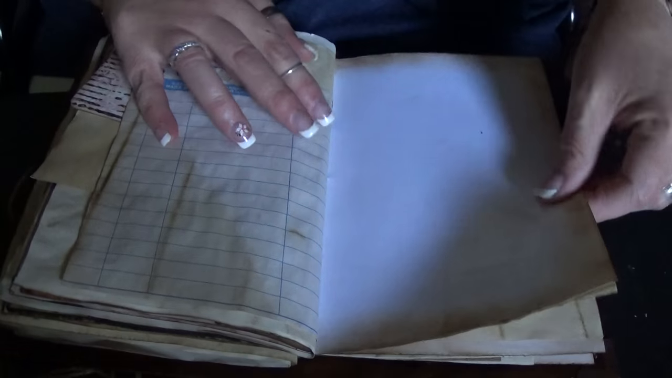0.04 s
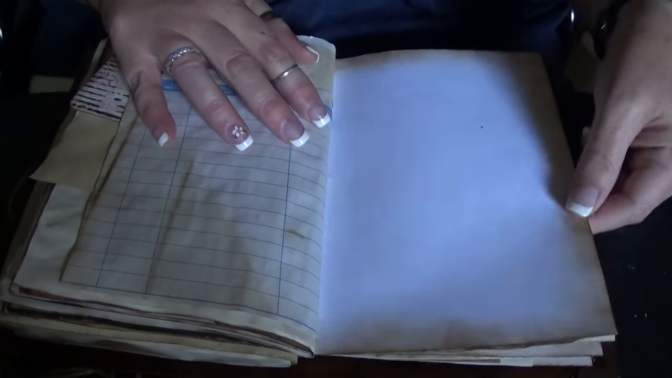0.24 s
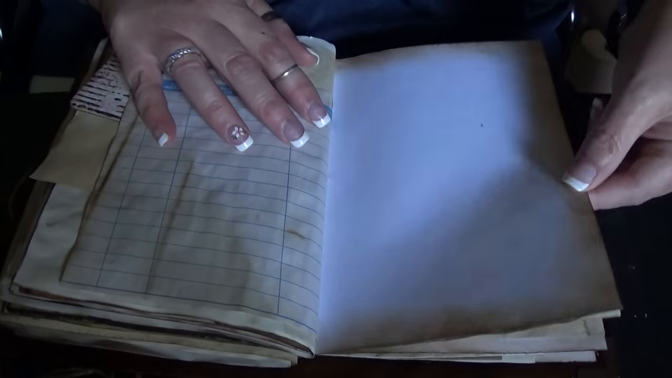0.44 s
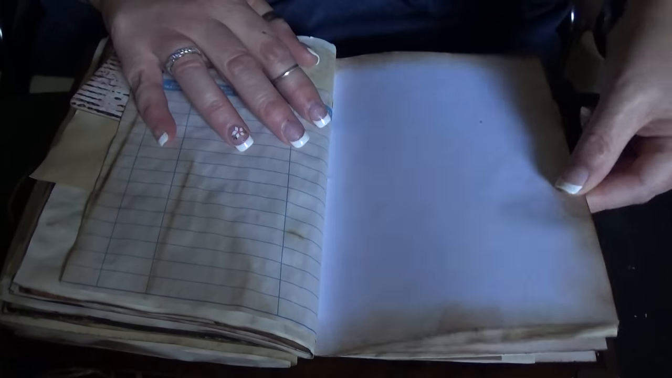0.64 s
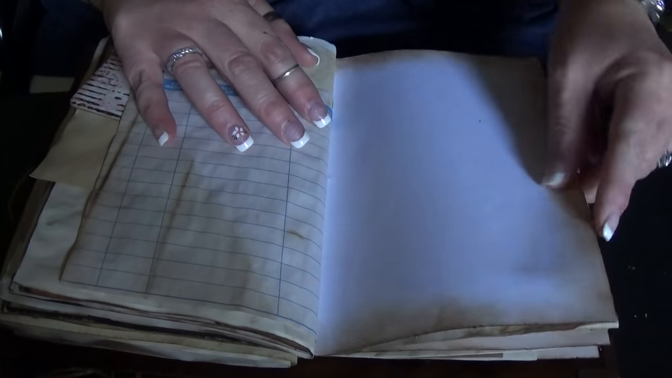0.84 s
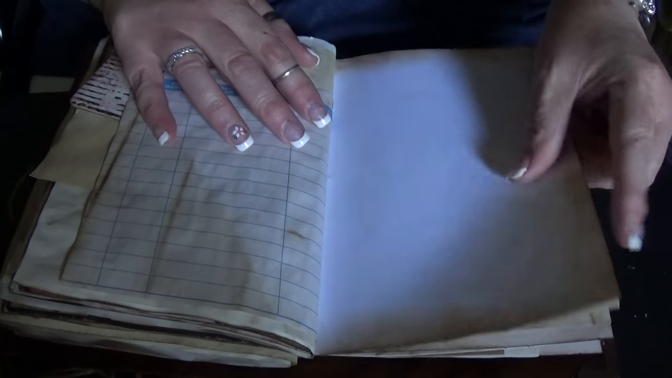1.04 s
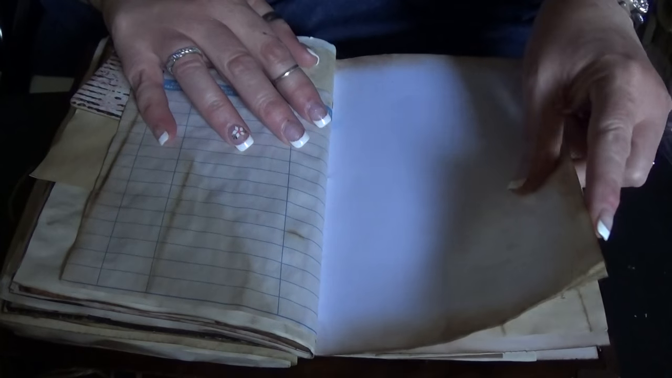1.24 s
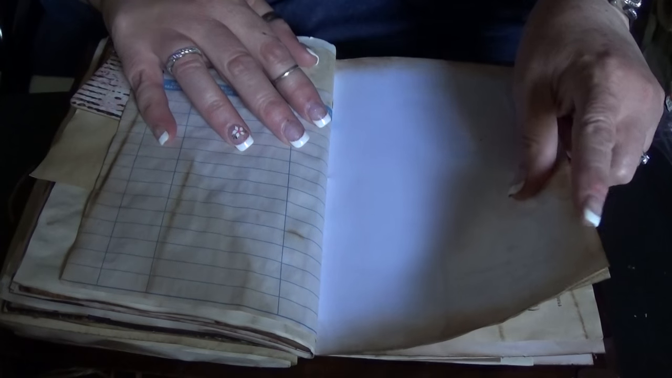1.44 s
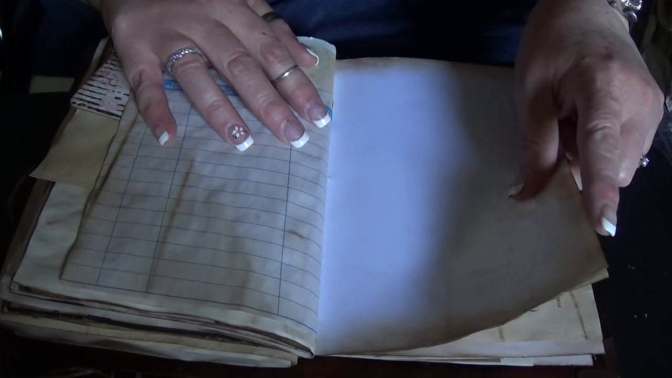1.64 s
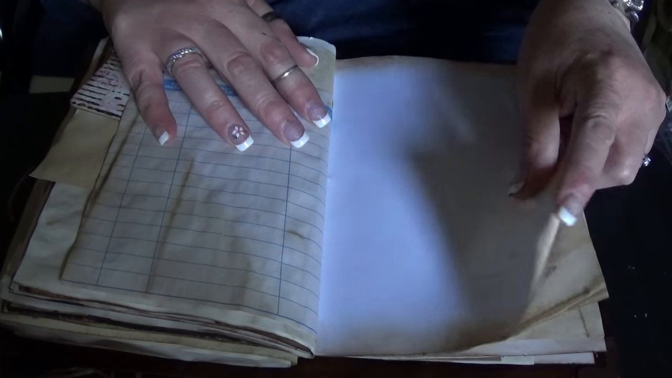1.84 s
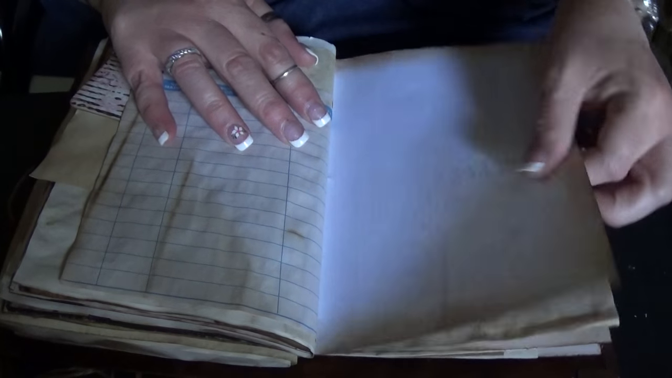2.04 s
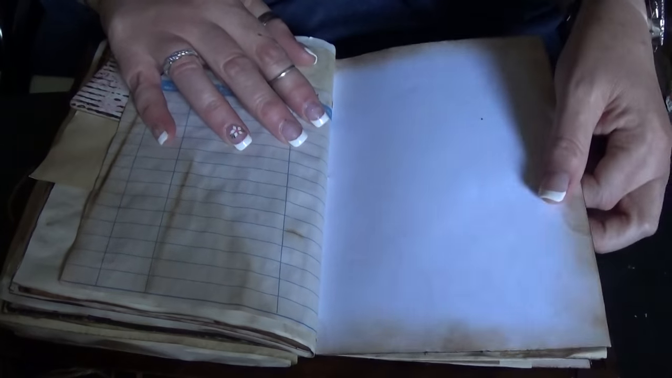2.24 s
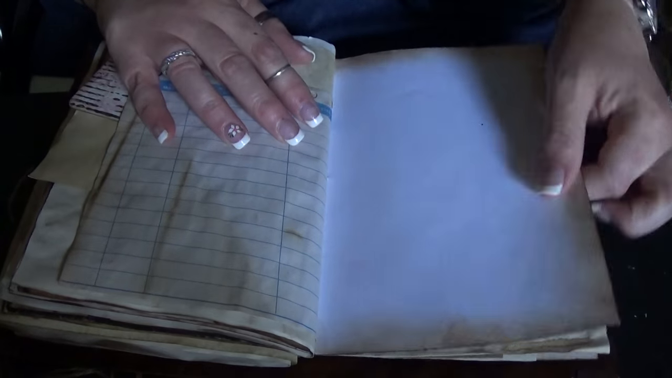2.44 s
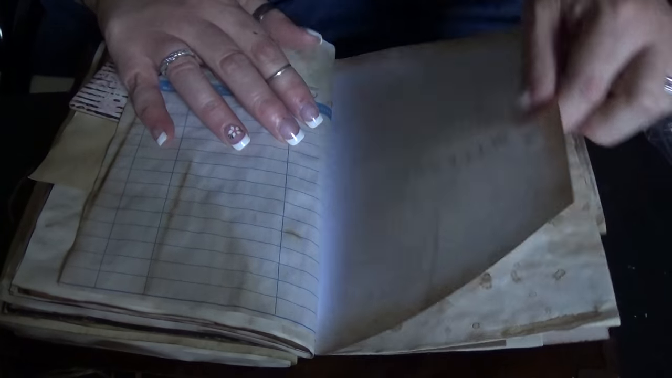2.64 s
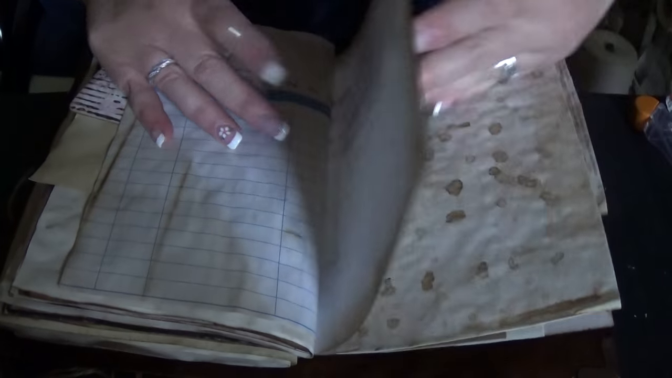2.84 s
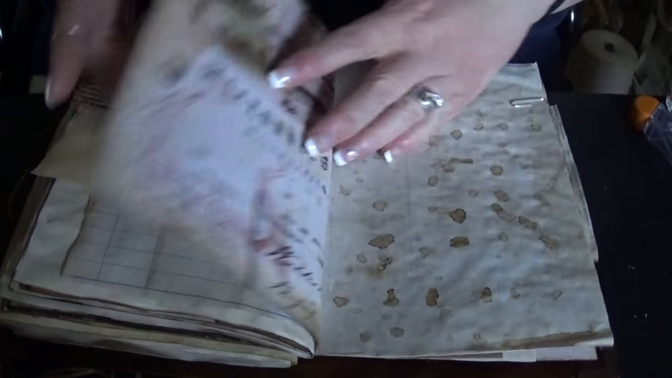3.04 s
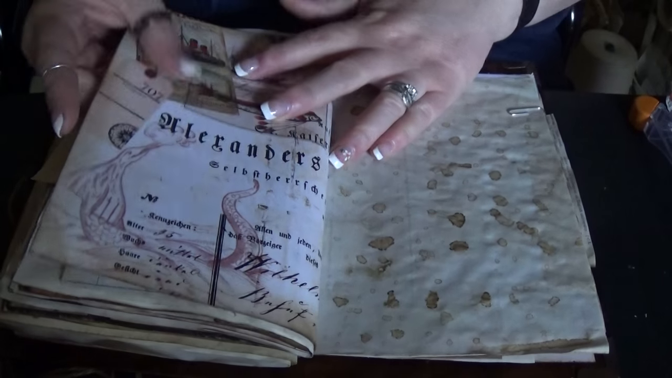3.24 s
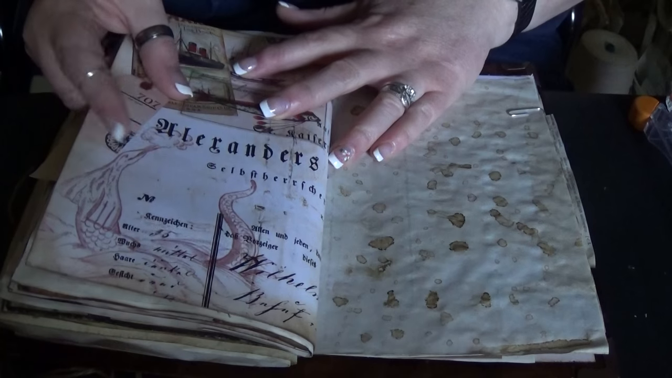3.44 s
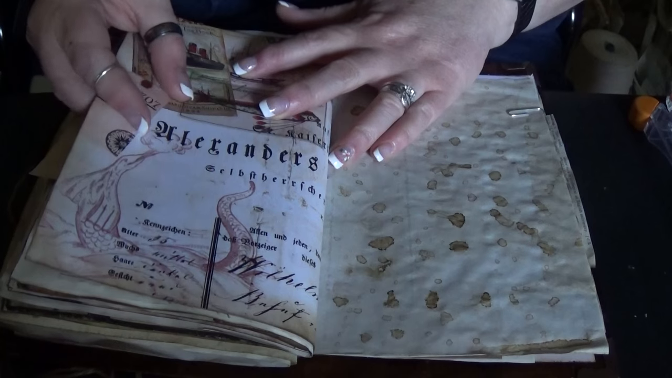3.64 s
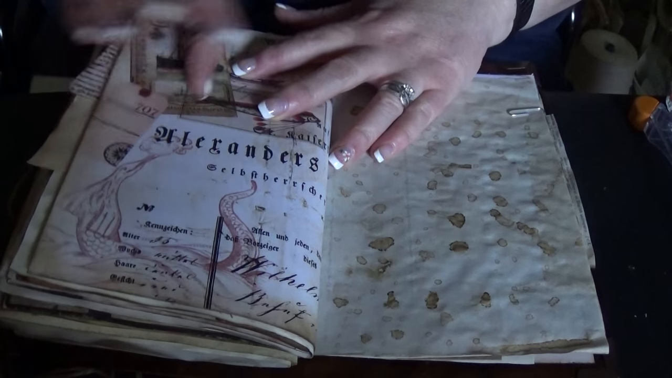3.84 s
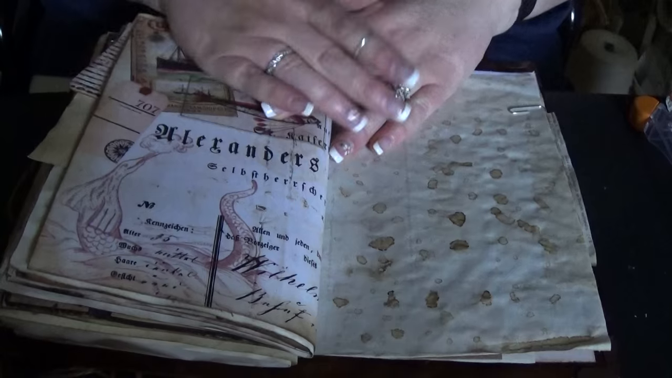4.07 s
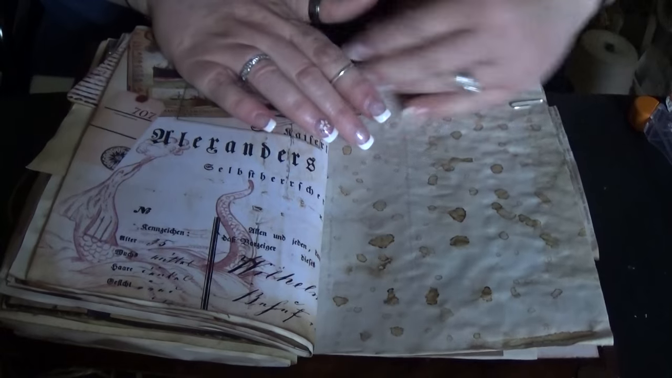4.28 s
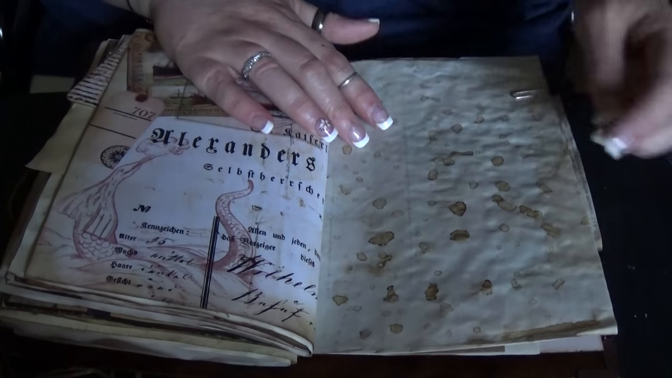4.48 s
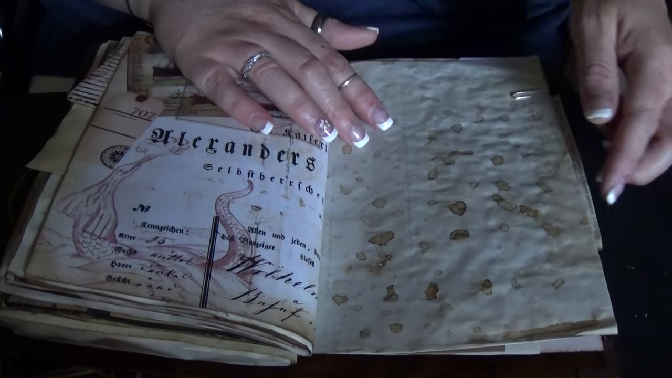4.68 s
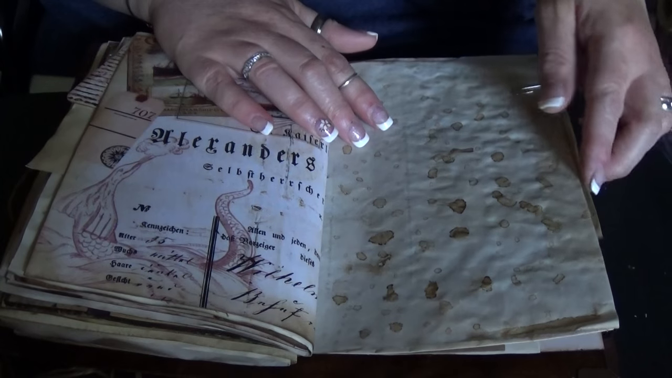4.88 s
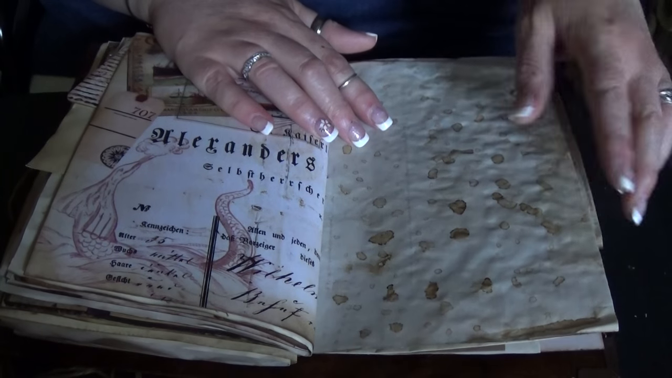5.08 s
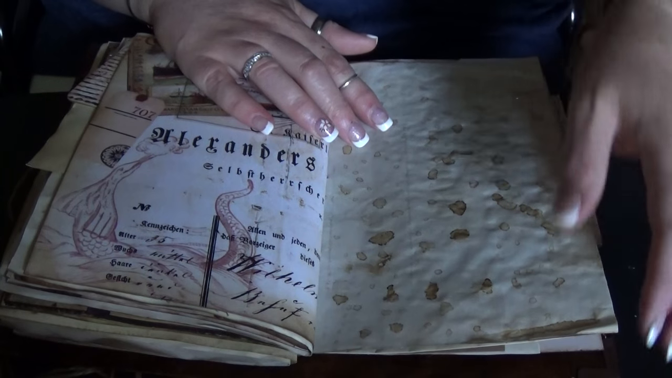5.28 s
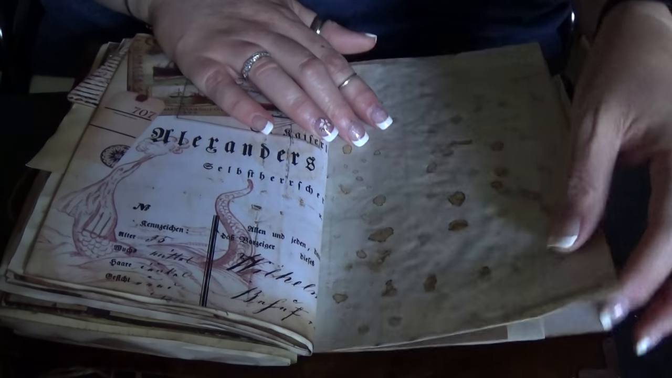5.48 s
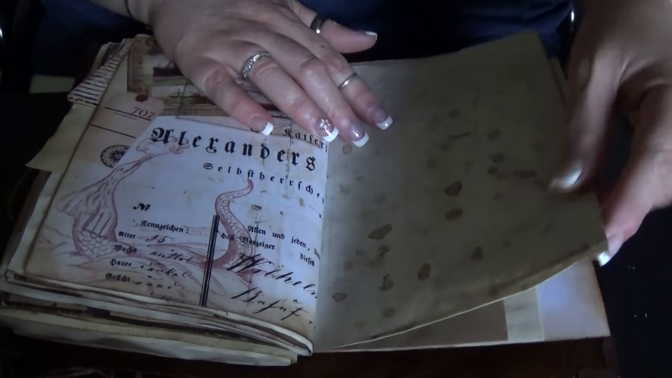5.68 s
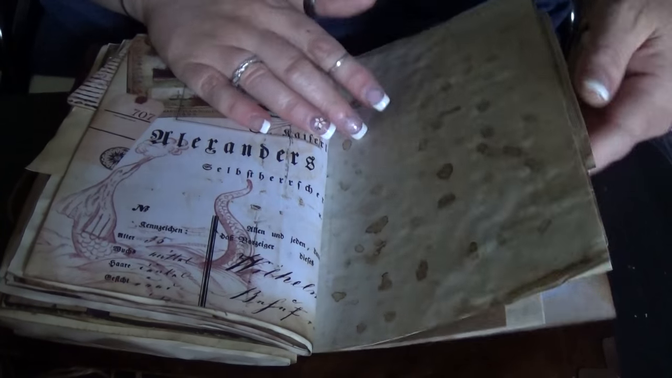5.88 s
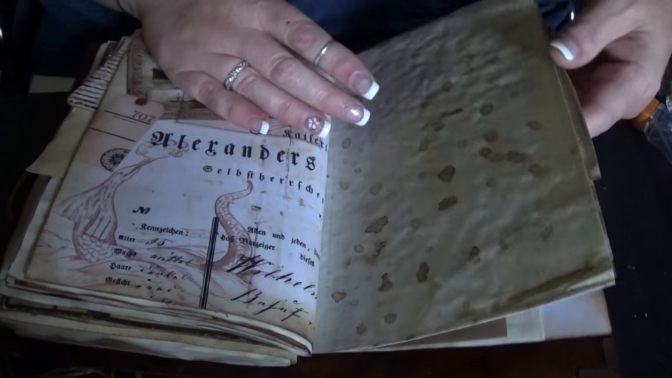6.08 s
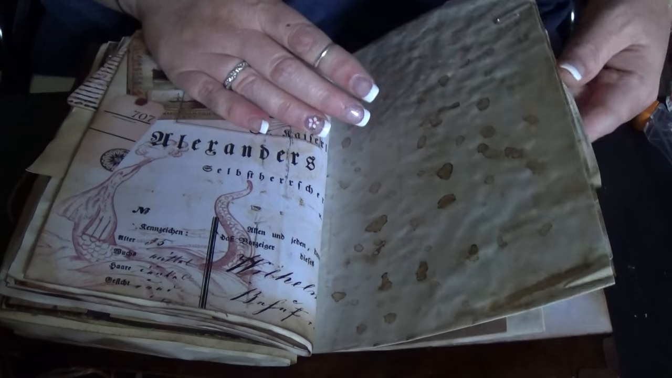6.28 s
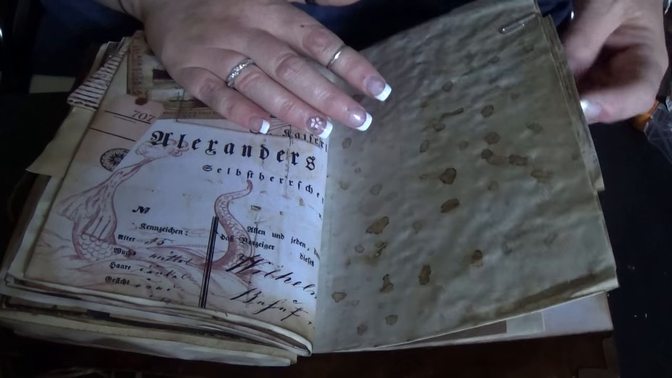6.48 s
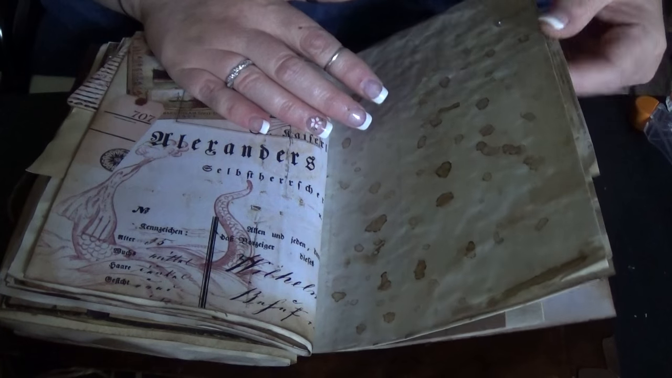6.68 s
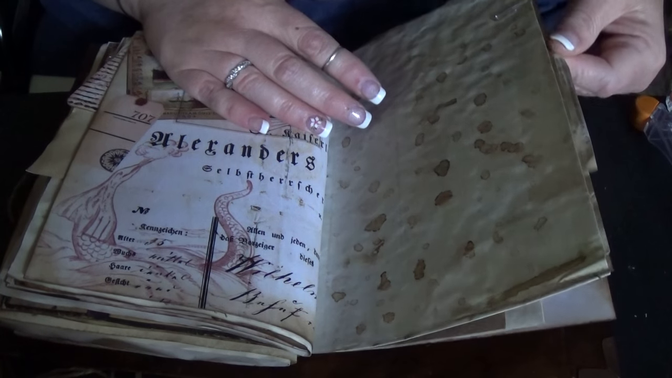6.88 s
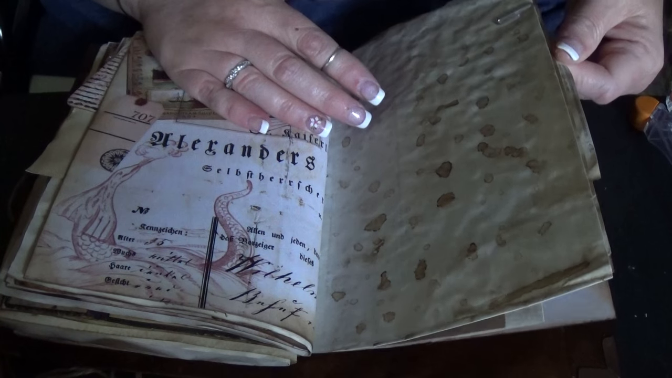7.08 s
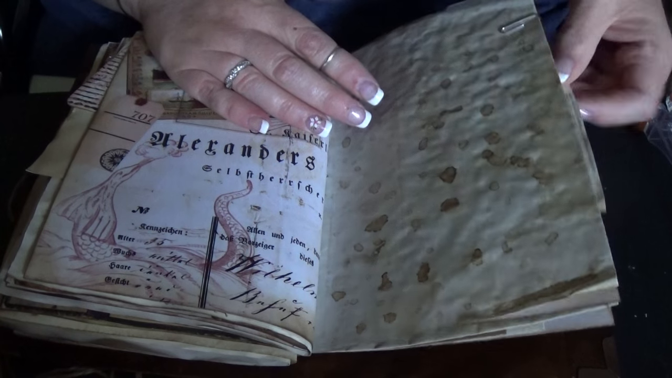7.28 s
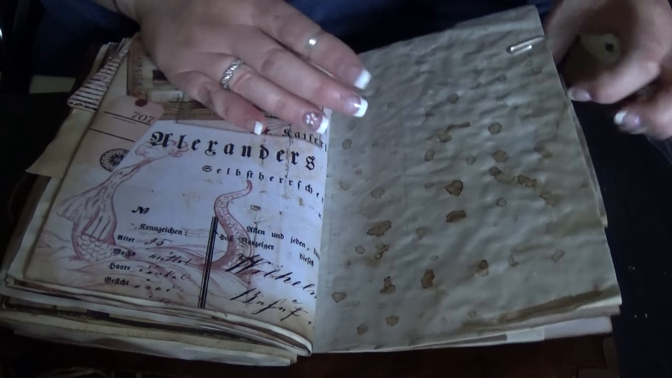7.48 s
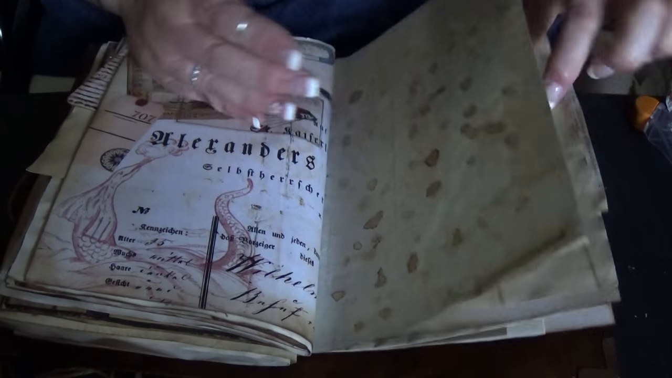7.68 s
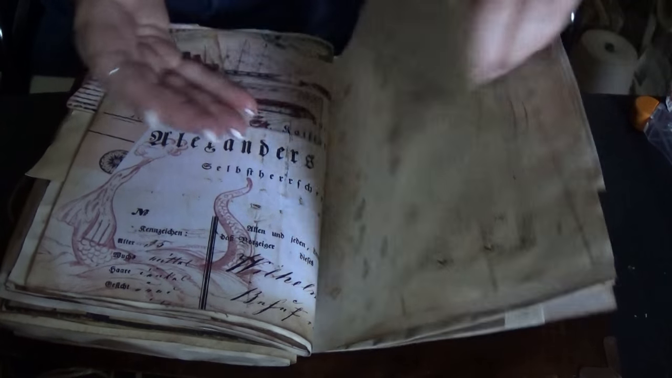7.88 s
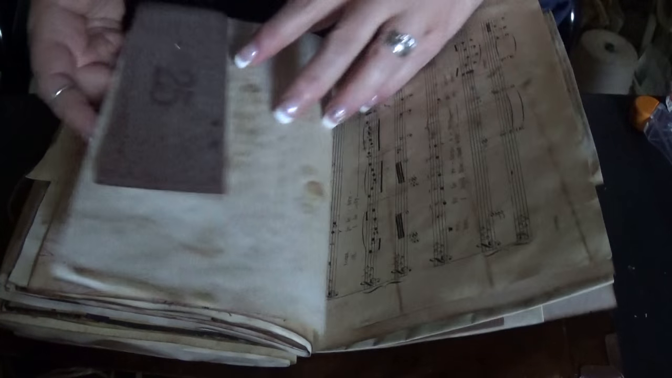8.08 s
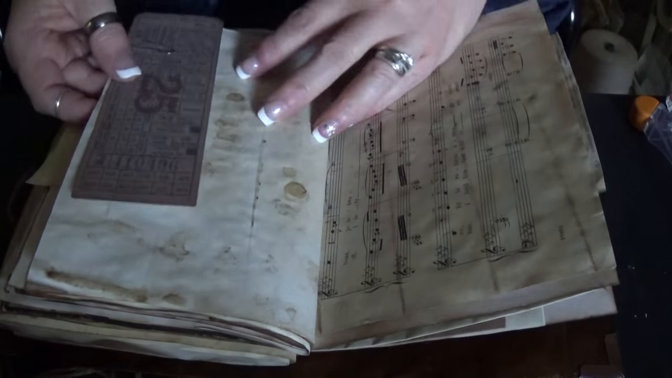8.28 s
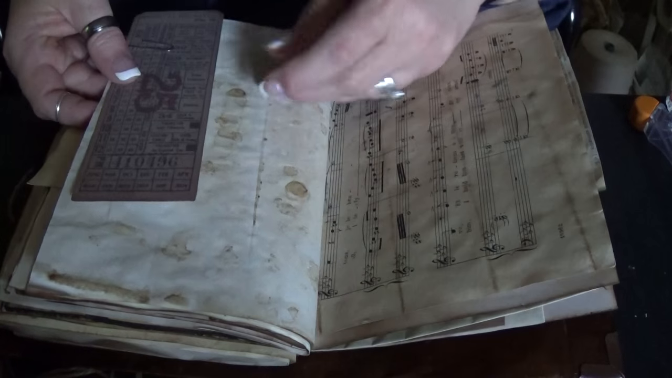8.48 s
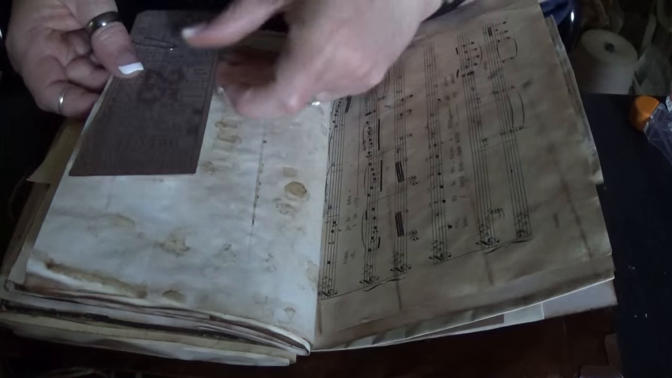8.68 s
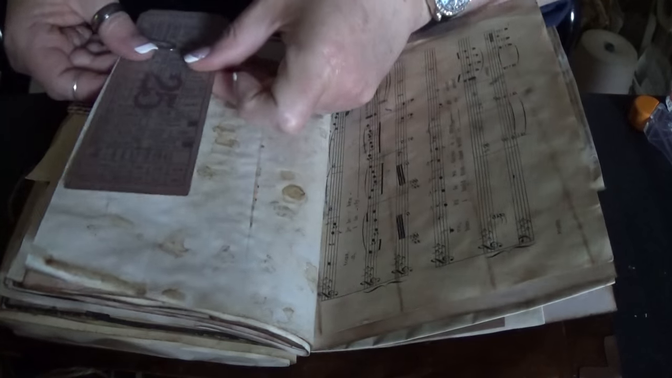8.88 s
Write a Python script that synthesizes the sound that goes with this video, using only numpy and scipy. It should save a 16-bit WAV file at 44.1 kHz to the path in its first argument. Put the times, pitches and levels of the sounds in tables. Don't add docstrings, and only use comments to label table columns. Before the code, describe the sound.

Close stereo pickup in a small, quiet, dry room, with light hiss, low room tone and wavering distant engine drones. From 0 to 1 s stiff paper rustles in short bursts with soft drops at 0.25 and 0.7. A sharp crease snap comes at 1.3, then a crackling, hissy flurry around 1.9-2.1. Faint, fast, high lens ticks run between about 0.4 and 5.5, mostly buried. A page turns from 2.7, landing firmly near 3.15; low pushes and rustle follow at 3.7-3.8, then smooth hand sliding around 4.2. From 4.5 to 5.4 it is sparse, with small ticks of paper. Crinkles return at 5.5, and a strong crackle with a thud comes at 6.35-6.4. After a lull near 7, rustling builds from 7.3 into the loudest snaps at 7.9 and 8.1 as another leaf turns. Smoothing, rubbing and crackles continue to 8.9.

```python
import sys
import numpy as np
from scipy import signal
from scipy.fft import rfft, irfft, next_fast_len
from scipy.io import wavfile
from scipy.ndimage import uniform_filter1d

SR = 44100
rng = np.random.default_rng(int(sys.argv[2]) if len(sys.argv) > 2 else 0)


def volts_from_db(level):
    exponent = np.asarray(level, float) / 20
    return 10 ** exponent


def dump(signal):
    limited = np.clip(np.atleast_2d(signal).T, -1, 1)
    pcm = np.round(limited * 32767).astype(np.int16)
    wavfile.write(sys.argv[1], SR, pcm)


N = 393372
TIME_S = np.arange(N) / SR

# freq_hz, density_db
SELF_NOISE = [(1180, -30), (2000, -4), (5830, -9.5), (9170, -8.5), (12000, -15), (15100, -12), (16000, -26)]
# freq_hz, density_db
ROOM_TONE = [(15, -42), (25, -11), (124, -3.5), (162, -3.5), (204, -7), (248, -1.5), (300, -9.5), (486, -8),
             (649, -13.5), (866, -10), (2500, -27.5), (3250, -59), (5500, -120)]
# freq_hz, correlation
LIKENESS = [(60, 0.99), (180, 0.98), (550, 0.75), (1650, 0.28), (4970, 0.51), (15000, 0.98)]
# start_s, level_db
TRAFFIC_LEVEL = [(0, 1.5), (2, 1), (4, 2), (5.5, 0), (7, 0), (8.92, 2)]
# start_s, pitch_hz, level_db
ENGINES = [
    [(0, 93, -65.5), (1.1, 93.7, -71.5), (2.6, 93.8, -58.5), (3.3, 93.2, -59), (3.9, 94.5, -72),
     (4.4, 96.6, -67)],
    [(.5, 212.5, -74), (.9, 216.6, -65.5), (1.3, 217.5, -60), (1.9, 217, -67), (2.3, 216, -80)],
    [(3.6, 250, -90), (4.4, 252, -69), (5.4, 244.4, -80.5), (6.5, 250, -75), (7.0, 252, -89)],
]
# start_s, level_db
LENS_LEVEL = [(.40, -57), (1.55, -61), (1.58, -80), (1.61, -80), (1.63, -59.5), (2.1, -57), (2.12, -70),
              (2.21, -70), (2.23, -60), (3.885, -58.5), (3.9, -80), (3.95, -80), (3.965, -60), (4.49, -59),
              (4.5, -70), (5.45, -67), (5.5, -90)]
# freq_hz, t60_s
ROOM_DECAY = [(200, 0.36), (4000, 0.089), (10000, 0.048), (16000, 0.13)]
# start_s, left_right_db
HAND_PAN = [(0.0, -1.5), (2.48, -0.5), (3.63, 2), (4.89, -2.5), (7.2, -1.0), (8.92, 1.0)]
# start_s, peak_db, pitch_hz
AIR_PUSHES = [
    (.24, -42, 272),
    (.67, -44.5, 274),
    (1.98, -63, 130),
    (3.139, -38.5, 475),
    (3.72, -45.5, 196),
    (3.801, -45, 130),
    (6.399, -45, 240),
    (7.929, -53, 140),
    (8.15, -50, 180),
    (8.7, -48, 300),
]
# start_s, peak_db, ring_hz, crack_over_peak_db, thump_over_peak_db
CREASES = [(0.2444, -36, 2090, -9, -1), (0.4319, -39, 3230, 4.5, -7), (0.6534, -34, 2270, -2, 1.5),
           (0.6774, -27, 2400, 5, 6), (0.8749, -25, 5900, -6, -18), (0.913, -25, 5760, -12, -7.5),
           (0.9581, -22.5, 2470, -11, -6.5), (1.0804, -40.5, 2560, -12, 5), (1.1266, -31, 3200, -6, -2),
           (1.289, -14, 3830, 2.5, -16.5), (1.3937, -28, 5100, -13, -27), (1.4194, -26.5, 3850, -9, -18),
           (1.9185, -20.5, 5420, 8.5, -12), (1.949, -21, 5110, -8, -24), (1.9706, -20, 5760, -5, -7),
           (2.0077, -15.5, 5900, -5, -26), (2.1889, -41, 2090, -3, -1), (2.2383, -39.5, 2300, -3, -10),
           (2.8165, -29, 2920, -2, -26), (3.0984, -27, 3160, -3, -15), (3.1363, -19.5, 3920, 3, -2),
           (3.1492, -17, 3050, -4, -10), (3.6494, -37.5, 3440, 0, 1), (3.7, -32, 3080, -1, -25),
           (3.7187, -32.5, 2960, 6, 7), (3.7994, -26, 5340, -9, -6), (4.7965, -40, 3360, -19, -15),
           (4.8389, -36, 3380, -6, -8), (4.8794, -37, 5770, 5, -17), (4.9505, -38.5, 1850, 1, -23),
           (5.0536, -30, 2860, -4, -24), (5.0642, -25, 4400, 2, -29), (5.4261, -39, 4010, 3.5, -8),
           (5.4694, -51, 2130, 3, -8), (5.524, -34, 2230, -6, -1), (5.5488, -21, 5040, -14, -12.5),
           (5.6174, -30.5, 3280, 0, -18), (5.7354, -32, 2320, -12, -7.5), (5.8646, -41.5, 1810, -7, 3),
           (5.9148, -36, 4380, -7, -8), (5.9494, -33.5, 5800, -4, -5.5), (6.1984, -28.5, 2340, -3, -9),
           (6.2283, -36.5, 2380, 4, 6), (6.2637, -25.5, 4900, 9, -6), (6.3499, -15, 4200, -4, -23),
           (6.3644, -19, 2780, 4, -22), (6.397, -11, 5000, 6, -12.5), (6.5725, -41, 2960, -11, -18),
           (6.7127, -29, 4500, -5, -13), (6.8394, -39, 3220, 9.5, -15), (7.2838, -34, 2710, 3, -1),
           (7.3105, -28, 2320, -10, -20), (7.571, -29, 3000, 2.5, -25), (7.5844, -35, 3640, -1, -10),
           (7.6037, -27.5, 3060, 3.5, -3.5), (7.7199, -27.5, 2680, -6, -21), (7.7666, -27, 3200, -12, -16),
           (7.8022, -22, 3900, -13, -20), (7.8251, -18.5, 2290, -11, -6), (7.8813, -15, 2600, -13, -14),
           (7.9032, -7.5, 3300, -3, -26), (7.9283, -18, 2300, 2, -15), (8.0008, -21, 3670, 4.5, -12),
           (8.0104, -24, 4200, 8, -21), (8.0652, -28, 5000, -2, -13), (8.096, -19.5, 2840, 1, -13),
           (8.1082, -8.5, 3120, 4, -22), (8.1544, -24.5, 2830, 1, -18), (8.3385, -30, 2620, -9, -15),
           (8.6147, -26, 2330, -11, -11), (8.6578, -18, 2990, -16, -10.5), (8.7114, -13, 3400, -6, -17.5),
           (8.7894, -26, 5870, 2, -11.5), (8.9074, -27.5, 3600, -18, -14)]
# freq_hz, density_db
CRACK_COLOUR = [(3000, -30), (6000, -7), (9000, 2.5), (11500, -6), (14000, -29), (16000, -32)]
# start_s, hiss_db, rustle_over_hiss_db
SLIDE_LEVEL = [(0.0, -42, -1.5), (0.052, -45.5, 5), (0.09, -56.5, 4), (0.112, -46, 3), (0.187, -38.5, 0),
               (0.247, -53, 4), (0.337, -47.5, -1), (0.404, -69.5, 6.5), (0.471, -60.5, 3.5),
               (0.606, -68.5, 3), (0.681, -46, 1), (0.778, -38, -7), (0.808, -61, 4), (0.838, -61, 2),
               (0.883, -36.5, -3), (1.003, -45, -3), (1.025, -58.5, -1), (1.078, -54, 4), (1.145, -76, 8),
               (1.235, -54, 3.5), (1.28, -59, 6), (1.295, -50, 2.5), (1.377, -60, 6.5), (1.408, -36.5, -4),
               (1.452, -62, 2.5), (1.497, -58.5, 4.5), (1.564, -50, -4), (1.586, -81, 3), (1.796, -82, 7),
               (1.841, -47, 4), (2.005, -28.5, -9.5), (2.065, -33.5, -6), (2.133, -49, -3), (2.178, -78, 3),
               (2.193, -57.5, 3), (2.245, -59.5, 0), (2.26, -71, 1), (2.432, -56, 1), (2.492, -63.5, 8),
               (2.522, -79, 2), (2.544, -60.5, 6.5), (2.664, -46.5, 6.5), (2.784, -49, -4.5),
               (2.821, -37, -1), (2.836, -69, 1), (2.851, -44, -4), (2.911, -38, -14.5),
               (2.941, -40.5, -11), (3.128, -38.5, -3.5), (3.143, -33, -6), (3.195, -42, -4.5),
               (3.315, -51, 0.5), (3.352, -47, -6.5), (3.457, -75, 3), (3.517, -51, -6.5),
               (3.637, -61, 4.5), (3.659, -47.5, -4.5), (3.727, -34.5, -6.5), (3.8, -40, 1),
               (3.824, -58.5, -1), (3.959, -80, 0), (4.041, -49.5, -9), (4.22, -34.5, -10),
               (4.378, -43, -7.5), (4.393, -38.5, -10), (4.437, -44.5, -11), (4.452, -62.5, -1),
               (4.565, -79.5, 5), (4.886, -61.5, 7.5), (4.916, -74, 3), (5.029, -72, 0), (5.059, -41, 0),
               (5.118, -70, -4), (5.395, -78, 2), (5.552, -46, -4.5), (5.597, -55.5, -6),
               (5.695, -41.5, -8.5), (5.769, -53.5, -2), (5.889, -48.5, -9), (5.927, -45.5, -2.5),
               (6.001, -46.5, -7), (6.069, -40, -6), (6.188, -56, 0.5), (6.218, -41.5, -4.5),
               (6.338, -46.5, 4), (6.353, -34.5, -1.5), (6.396, -35.5, 4.5), (6.443, -50, -2),
               (6.503, -59.5, -1), (6.6, -56.5, 1), (6.63, -68.5, -2.5), (6.735, -44, 0.5),
               (6.817, -56, -2), (6.839, -54.5, -7), (6.922, -72, 7), (7.184, -71, 2), (7.311, -43.5, -2.5),
               (7.326, -54, 4), (7.393, -39, -1.5), (7.483, -55.5, -1.5), (7.543, -51, 1), (7.558, -63, 2),
               (7.58, -56, -1), (7.648, -63, 3), (7.67, -54, 5), (7.715, -51, -9.5), (7.775, -42, 4),
               (7.82, -56, -2), (7.857, -40, -6.5), (8.022, -38.5, -3.5), (8.052, -45.5, -4.5),
               (8.089, -43.5, -9), (8.104, -38, 2), (8.216, -40.5, -9), (8.388, -45, -4.5),
               (8.411, -36, -6.5), (8.463, -50, 2), (8.703, -39, -7.5), (8.748, -40.5, -11),
               (8.785, -33, -13), (8.845, -38, -3), (8.92, -52, -4)]
# start_s, thump_db
BLOCK_LEVEL = [(0.0, -56), (0.247, -45.5), (0.397, -63), (0.584, -58.5), (0.681, -47), (0.838, -60.5),
               (0.965, -52), (1.048, -65), (1.085, -49.5), (1.175, -61), (1.414, -58), (1.811, -70.5),
               (1.886, -57.5), (2.028, -52.5), (2.17, -63), (3.12, -58.5), (3.143, -43.5), (3.248, -59.5),
               (3.622, -67), (3.809, -53.5), (4.018, -69), (4.265, -57), (5.463, -68), (5.537, -58.5),
               (5.852, -61), (6.173, -63), (6.241, -51), (6.316, -58), (6.39, -38.5), (6.45, -56.5),
               (6.667, -66.5), (6.735, -55.5), (6.959, -65.5), (7.251, -64), (7.296, -59), (7.73, -58.5),
               (7.827, -43), (8.082, -57), (8.119, -45), (8.291, -62.5), (8.396, -51), (8.583, -59.5),
               (8.725, -54.5), (8.92, -56.5)]
# start_s, freq_hz
SHEET_RESONANCE = [(0.0, 4000), (0.47, 3390), (2.16, 4930), (2.28, 3570), (4.47, 4000), (4.62, 3050),
                   (5.39, 4140), (8.62, 3310), (8.92, 4670)]
# freq_hz, density_db
HISS_COLOUR = [(3000, -38), (6000, -12.5), (7500, -7.5), (9500, 2), (11000, -4.5), (12500, -11.5),
               (14500, -17), (16000, -19)]
# freq_hz, density_db
RUSTLE_COLOUR = [(900, -5), (1800, -4.5), (2800, 1), (4200, 0), (6000, -0.5), (8000, -3.5), (12000, -42)]
# freq_hz, density_db
THUMP_COLOUR = [(150, -31), (400, -10), (800, 2.5), (1300, -1), (2000, -4.5), (3000, -10), (6000, -60)]


def evened(x):
    return x / np.sqrt(np.mean(x ** 2) + 1e-20)


def read(points, hz):
    point_hz, value = np.transpose(points)
    return np.interp(np.log(hz + 1), np.log(point_hz + 1), value)


def track(points, s=TIME_S):
    return np.interp(s, *np.transpose(points))


def add(mix, start_s, sound):
    part = mix[:, max(round(start_s * SR), 0):][:, :sound.shape[1]]
    part += sound[:, :part.shape[1]]


def colour(x, points):
    size = next_fast_len(len(x))
    gain = volts_from_db(read(points, np.fft.rfftfreq(size, 1 / SR)))
    return evened(irfft(rfft(x, size) * gain, size)[:len(x)])


def wander(seconds):
    size = max(int(seconds * SR), 2)
    smooth = uniform_filter1d(rng.standard_normal(N), size)
    return evened(uniform_filter1d(smooth, size))


def burst(noise, points, rise_s, t60_s):
    t = np.arange(len(noise)) / SR
    puff = colour(noise, points) * (1 - np.exp(-t / rise_s)) * volts_from_db(-60 * t / t60_s)
    return puff / abs(puff).max()


def hands(s, spread):
    pan_db = spread * track(HAND_PAN, s)
    return np.array([volts_from_db(pan_db / 2), volts_from_db(-pan_db / 2)])


def wash(points, level_db, patch_db):
    frames, hz = N // 256 + 5, np.fft.rfftfreq(1024, 1 / SR)
    a, b, c, d, patches = rng.standard_normal((frames, 513, 5)).T
    patches = uniform_filter1d(patches, size=8, axis=0)
    patches = evened(uniform_filter1d(patches, size=30, axis=1))
    same = np.clip(read(LIKENESS, hz), 0, 1)[:, None]
    mid = np.sqrt(1 + same) * (a + 1j * b)
    side = np.sqrt(1 - same) * (c + 1j * d)
    gain_db = read(points, hz)[:, None] + patch_db * patches
    z = np.array([mid + side, mid - side]) * volts_from_db(gain_db)
    noise = signal.istft(z, nperseg=1024, noverlap=768)[1][:, :N]
    return volts_from_db(level_db) * evened(noise)


def room_tone():
    return wash(ROOM_TONE, -59 + track(TRAFFIC_LEVEL), 1.25)


def drones():
    out = np.zeros(N)
    for engine in ENGINES:
        s, hz, db = np.transpose(engine)
        pitch_hz = np.interp(TIME_S, s, hz) * (1 + 0.00576 * wander(0.08))
        turns = np.cumsum(pitch_hz) / SR
        level_db = np.interp(TIME_S, s, db, left=-120, right=-120) + 2.7 * wander(0.066)
        out += np.sqrt(2) * volts_from_db(level_db) * np.sin(2 * np.pi * turns)
    return out


def lens_drive():
    drive_hz, frame_s, first_s = 3240, 1001 / 30000, 0.4378
    since_s = (TIME_S - first_s + frame_s / 2) % frame_s - frame_s / 2
    level_db = np.interp(TIME_S, *np.transpose(LENS_LEVEL), left=-120, right=-120)
    level = volts_from_db(level_db + 1.3 * wander(0.02))
    tick = np.exp(-(since_s / 0.0039) ** 2)
    return 1.4 * level * tick * np.sin(2 * np.pi * drive_hz * TIME_S)


def room(x):
    size = SR // 2
    taps = np.zeros((2, size))
    at = np.arange(100, size - 20, 20) + rng.integers(0, 20, (2, (size - 101) // 20))
    np.put_along_axis(taps, at, rng.choice([-1., 1.], at.shape), 1)
    hz, t, z = signal.stft(taps, SR, nperseg=256)
    decay = volts_from_db(-60 * t / read(ROOM_DECAY, hz)[:, None])
    tail = signal.istft(z * decay, SR, nperseg=256)[1]
    tail = tail / np.linalg.norm(tail[0])
    return signal.fftconvolve(x.mean(0)[None], tail, axes=1)[:, :N]


def puffs():
    out = np.zeros((2, N))
    noises = rng.standard_normal((len(AIR_PUSHES), 9000))
    for (start_s, peak_db, hz), noise in zip(AIR_PUSHES, noises):
        hump = [(0.14 * hz, -25), (hz, 0), (2.8 * hz, -25), (8 * hz, -70)]
        push = burst(noise, hump, rise_s=0.011, t60_s=0.14)
        add(out, start_s, volts_from_db(peak_db) * np.array([push, push]))
    return out


def snaps():
    out = np.zeros((2, N))
    noises = rng.standard_normal((len(CREASES), 3, 1600))
    for (start_s, peak_db, hz, crack_db, thump_db), (a, b, c) in zip(CREASES, noises):
        resonance = [(0.22 * hz, -40), (0.5 * hz, -11), (hz, 0), (1.56 * hz, -9), (3 * hz, -30)]
        ring = burst(a, resonance, rise_s=0.00026, t60_s=0.013)
        crack = volts_from_db(crack_db) * burst(b, CRACK_COLOUR, rise_s=0.00036, t60_s=0.0058)
        thump = volts_from_db(thump_db) * burst(c, THUMP_COLOUR, rise_s=0.001, t60_s=0.033)
        gains = volts_from_db(peak_db - 2.5) * hands(start_s, 1.44)[:, None]
        add(out, start_s, gains * (ring + crack + thump))
    return out


def slips(per_s, spread_db, clump_db):
    size = volts_from_db(spread_db * np.minimum(rng.exponential(1, N), 5) + clump_db)
    sign = rng.choice([-1., 1.], N)
    return size * sign * (rng.random(N) < per_s / SR)


def patchy(x, patch_db, lift_db):
    hz, t, z = signal.stft(x, SR, nperseg=256, noverlap=192)
    patches = uniform_filter1d(rng.standard_normal(z.shape), size=4, axis=0)
    patches = evened(uniform_filter1d(patches, size=24, axis=1))
    octaves = np.log2((hz[:, None] + 1) / track(SHEET_RESONANCE, t))
    gain_db = patch_db * patches + lift_db * np.exp(-(octaves / 0.51) ** 2)
    return evened(signal.istft(z * volts_from_db(gain_db), SR, nperseg=256, noverlap=192)[1][:N])


def sliding():
    s, hiss_points_db, rustle_points_db = np.transpose(SLIDE_LEVEL)
    hiss_db = np.interp(TIME_S, s, hiss_points_db)
    rustle_db = np.interp(TIME_S, s, rustle_points_db)
    grip = 0.25 * wander(0.0098) + wander(0.0043)
    hiss = patchy(colour(slips(16000, 2.1, 1.4 * grip), HISS_COLOUR), 2.26, 0)
    rustle = patchy(colour(slips(7000, 1.5, 1.4 * grip), RUSTLE_COLOUR), 2.5, 3.53)
    thump = patchy(colour(slips(2500, 2.5, 2.45 * grip), THUMP_COLOUR), 2.9, 0)
    drag = hiss * hands(TIME_S, 0.73) + volts_from_db(rustle_db) * rustle * hands(TIME_S, 1.2)
    return volts_from_db(hiss_db) * drag + volts_from_db(track(BLOCK_LEVEL)) * thump * hands(TIME_S, 0.81)


def scene():
    paper = sliding() + snaps()
    background = room_tone() + drones() + lens_drive()
    return paper + volts_from_db(-15.5) * room(paper) + puffs() + background


def low_pass(x):
    return signal.sosfilt(signal.butter(12, 16520, fs=SR, output="sos"), x)


def record(dry):
    wet = dry + wash(SELF_NOISE, -65, 0.51)
    mid, side = (wet[0] + wet[1]) / 2, (wet[0] - wet[1]) / 2
    side = 1.2 * signal.lfilter([1 - 0.15], [1, -0.15], side)
    side = side - 0.71 * signal.lfilter([1 - 0.988], [1, -0.988], side)
    edge = signal.firwin(401, 15820, window=("kaiser", 9), fs=SR)
    limited = signal.oaconvolve(np.array([mid + side, mid - side]), edge[None], "same")
    return low_pass(limited)


dry = scene()
out = record(dry)
dump(out)
```